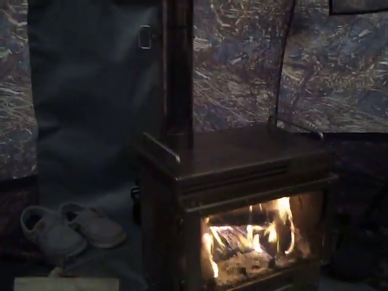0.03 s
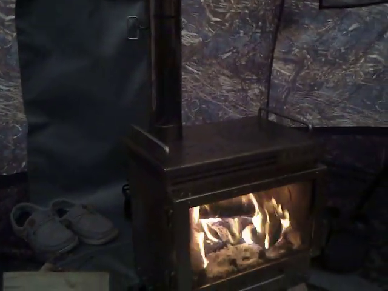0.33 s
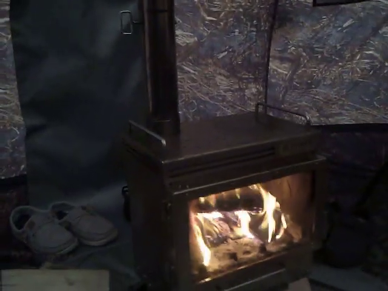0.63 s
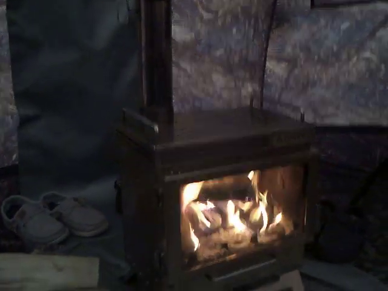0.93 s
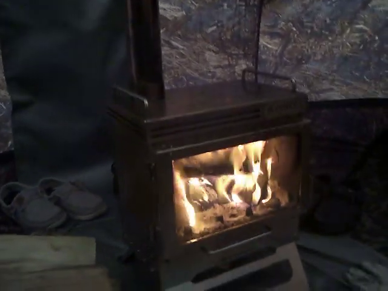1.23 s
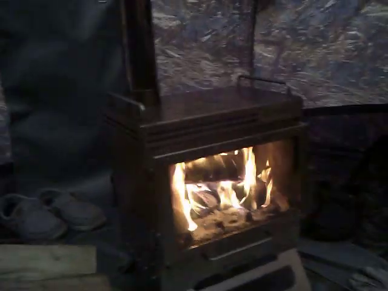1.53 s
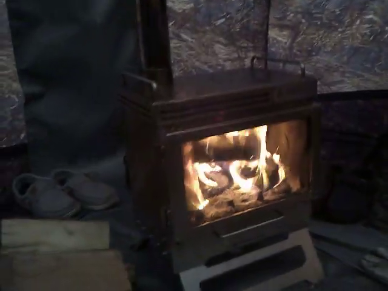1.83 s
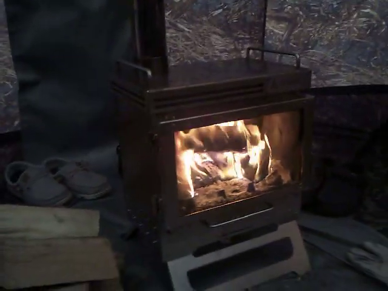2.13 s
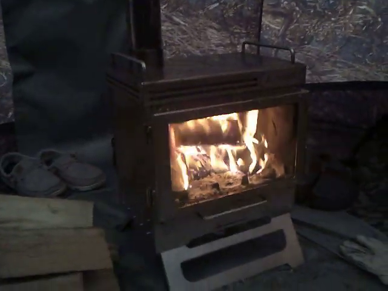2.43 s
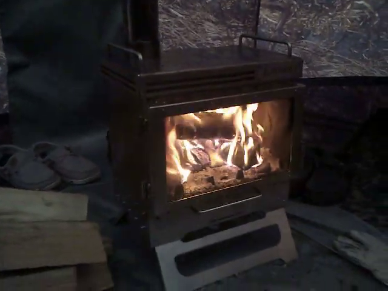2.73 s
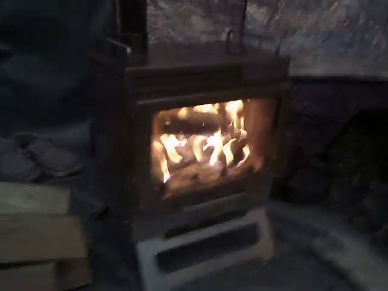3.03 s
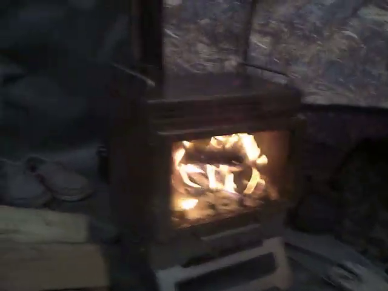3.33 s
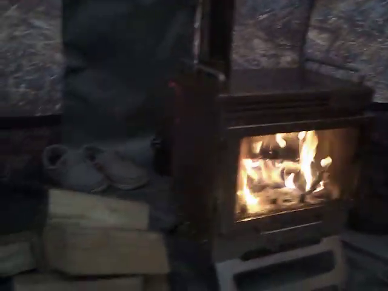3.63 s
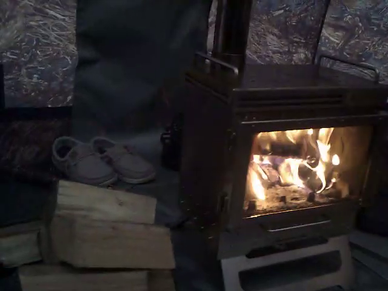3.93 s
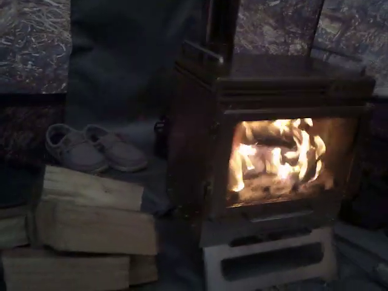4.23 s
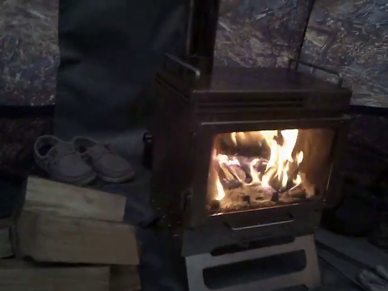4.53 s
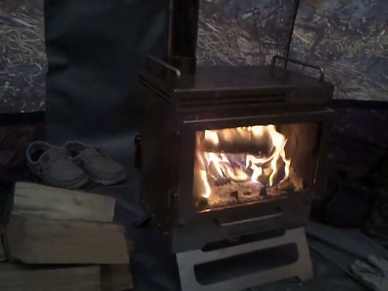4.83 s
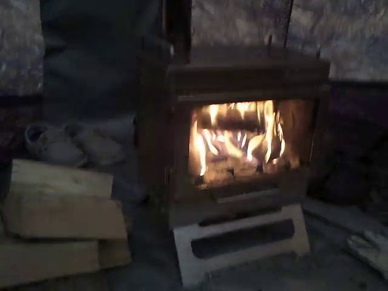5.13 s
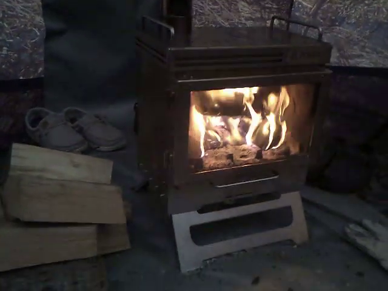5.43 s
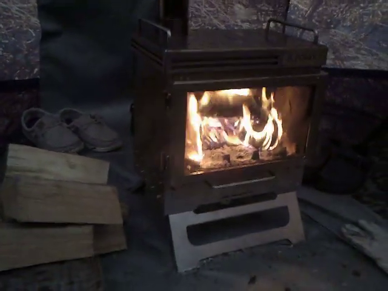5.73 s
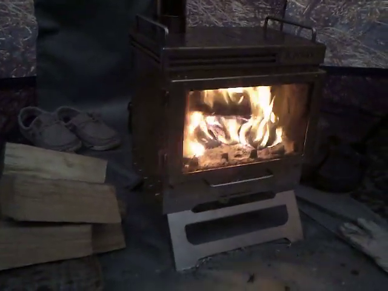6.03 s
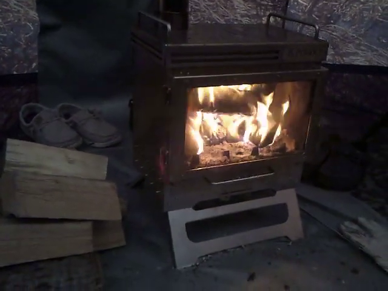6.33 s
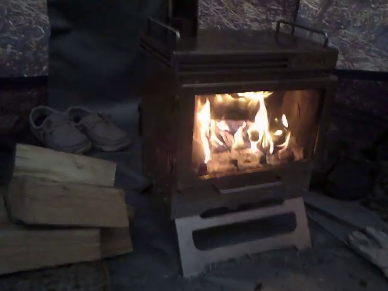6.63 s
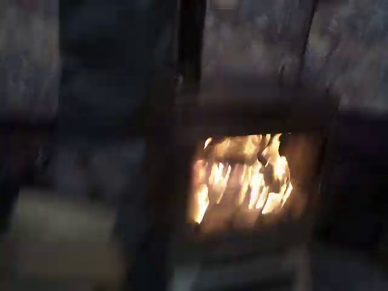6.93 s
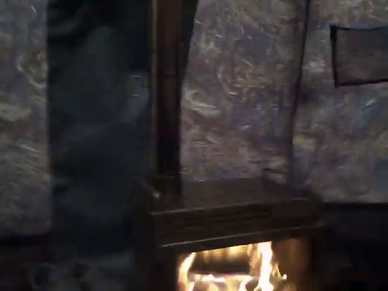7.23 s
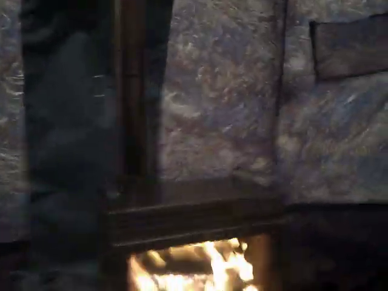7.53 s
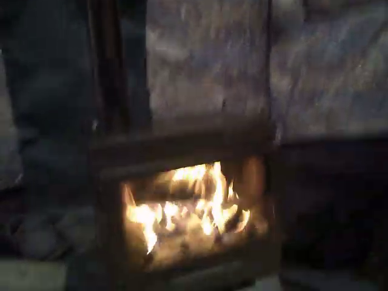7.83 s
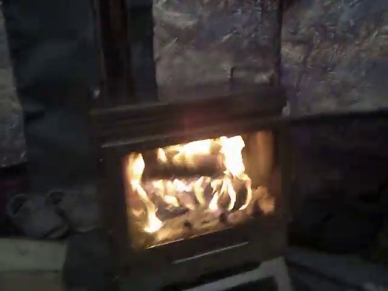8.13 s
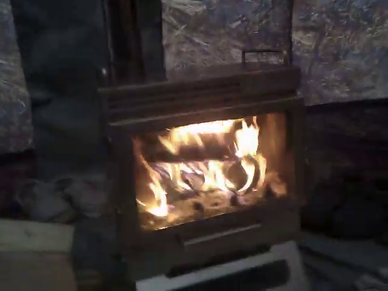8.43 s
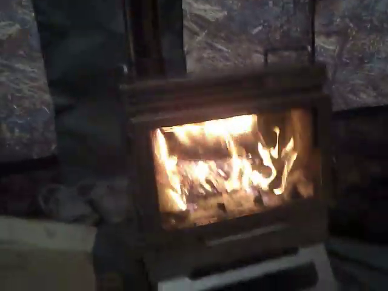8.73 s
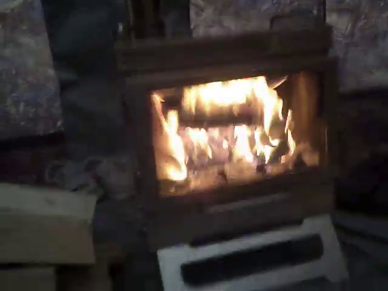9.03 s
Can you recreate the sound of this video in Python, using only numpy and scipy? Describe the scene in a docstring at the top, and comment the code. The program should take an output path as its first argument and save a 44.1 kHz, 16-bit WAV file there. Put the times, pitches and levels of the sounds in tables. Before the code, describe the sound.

Wood fire clicks and snaps in a stove over a low rumble and faint motor hum, with microphone handling near the end.

```python
"""Wood stove in a tent

Near the microphone, burning wood breaks in sharp clicks, snaps ring briefly in the steel firebox and
embers flare now and then. The draught rumbles; far off a motor, perhaps a generator, hums under it.
The hand-held camera moves, mostly near the end: clicks, sleeve strokes, scrapes and soft bumps."""
import sys
import numpy as np
from scipy import signal
from scipy.fft import rfft, irfft, next_fast_len
from scipy.io import wavfile
from scipy.ndimage import map_coordinates

SR = 44100
rng = np.random.default_rng(int(sys.argv[2]) if len(sys.argv) > 2 else 0)


def unload_wav(signal):
    """Save mono or channel-first audio to the path in sys.argv[1] as 16-bit WAV at rate SR, clipped to [-1, 1]."""
    wavfile.write(
        sys.argv[1],
        SR,
        np.round(np.clip(np.atleast_2d(signal).T, -1, 1) * 32767).astype(np.int16),
    )


N = 409688

# the microphone's own hiss (frequency [Hz], gain [dB])
HISS_SPECTRUM = [(3500, -20), (4500, -7), (5400, -8), (6100, -1), (7400, 0), (8200, -5), (9000, -12)]
# harmonics of the far motor (shaft order [multiple], base level [dB])
MOTOR_ORDERS = [(1, -52.5), (2, -46), (3, -59), (4, -69.5), (20, -64.5), (27, -73.5), (40, -86.5),
                (48, -87.5), (64, -87), (65, -89), (88, -92), (128, -101), (147, -104)]
# the whine fades and returns as the microphone moves through its reflections (time [s], gain [dB])
WHINE_GAIN = [(0, -3.5), (1.7, 4), (2.3, -2.5), (3.9, -4), (5.1, 3), (6.7, 1), (9.29, -4.5)]
# deep rumble of the draught (frequency [Hz], gain [dB])
RUMBLE_SPECTRUM = [(8, 7), (18, 2), (28, 7), (42, -2), (60, -4), (80, -12), (120, -35), (250, -83)]
# its slow rise and fall (time [s], level [dB])
RUMBLE_LEVELS = [(0, -41), (1.4, -44), (2, -47), (4.2, -45), (5.4, -42.5), (6.1, -48), (7.3, -42),
                 (8.7, -41), (9.29, -43)]
# fluttering flames (frequency [Hz], gain [dB])
FLUTTER_SPECTRUM = [(50, -5.5), (85, 3.5), (120, -0.5), (150, -2.5), (230, -7.5), (330, -12), (450, -22.5),
                    (800, -75)]
# air roaring through the stove (frequency [Hz], gain [dB])
ROAR_SPECTRUM = [(200, -15), (450, -1.5), (600, 3.5), (850, 3.5), (1020, -1), (1330, -18), (1500, -17),
                 (1850, -19), (2200, -22.5), (3100, -25), (3800, -33), (5200, -48), (8000, -72.5)]
# sleeve strokes right at the microphone (start [s], length [s], rub level [dB], hiss level [dB])
SLEEVE_STROKES = [(8.058, 0.086, -59.5, -81), (8.228, 0.18, -52.5, -70.5), (8.476, 0.021, -52.5, -67.5),
                  (8.781, 0.06, -54.5, -66.5), (8.897, .1, -55.5, -73.5), (9.071, 0.032, -54, -70.5)]
# rubbing cloth (frequency [Hz], gain [dB])
RUB_SPECTRUM = [(240, -15.5), (500, -6), (1000, 5), (1400, -5), (1900, -2), (2500, -9.5), (3200, -6),
                (3900, -23.5), (5000, -30), (6500, -53)]
# fingers on the camera's case (middle [s], level [dB], length [s], resonance [Hz])
FINGER_SCRAPES = [(0.231, -62, .09, 1600), (6.79, -64, 0.016, 1580), (8.342, -44, 0.041, 1450),
                  (8.422, -49, 0.012, 2780), (8.502, -43.5, 0.019, 1980), (8.802, -46, 0.018, 1570),
                  (8.929, -56.5, 0.079, 2590)]
# soft bumps on the camera (start [s], level [dB], pitch [Hz])
CAMERA_BUMPS = [(1.616, -22.5, 243), (3.001, -28.5, 18), (6.57, -40, 260), (6.84, -29.5, 14.4),
                (8.076, -28, 92), (8.361, -26.5, 91), (8.735, -29.5, 61), (8.7503, -28, 184)]
# the embers flare up (middle [s], half length [s], rise over the resting crackle [dB])
EMBER_FLARES = [(.6, 0.68, 13.5), (1.55, 0.31, 13), (4.7, 0.59, 10), (7.5, 0.45, 10.5), (8.7, 0.75, 12.5)]
# modes of the stove's steel plates (frequency [Hz], gain [dB], time to fall 60 dB [s])
PLATE_MODES = [(1518, -8, .3), (1570, -3, 0.12), (1710, -19.5, 0.17), (1850, -16.5, 0.27), (2350, -17, .2),
               (3020, -16.5, 0.32), (3440, -15.5, .15)]
# snaps inside the firebox (time [s], level [dB])
FIREBOX_SNAPS = [(0.4838, -54.5), (0.572, -59.5), (0.7386, -53.5), (0.8624, -64), (1.415, -52.5),
                 (1.6423, -59), (1.6934, -63), (1.821, -55.5), (1.91, -60), (2.339, -54.5), (3.136, -49),
                 (3.261, -50.5), (3.451, -56.5), (4.3156, -67), (4.423, -58), (4.7676, -54),
                 (6.1519, -64.5), (6.556, -55.5), (7.5333, -65), (7.589, -58), (7.6231, -62.5),
                 (7.8266, -67), (8.2354, -52), (8.798, -54)]
# body of a snap (frequency [Hz], gain [dB])
SNAP_SPECTRUM = [(150, -13), (290, -1), (420, -8), (800, -4.5), (1250, -5), (1700, 0), (2400, 0.5),
                 (3100, -2), (3900, -13), (5000, -17.5), (7000, -41.5)]
# sizzle of a snap, also the hiss of the sleeve (frequency [Hz], gain [dB])
SIZZLE_SPECTRUM = [(2500, -28.5), (4200, -8.5), (5200, -10), (6200, 7), (7500, 3.5), (8400, -12),
                   (9000, -23)]
# dry clicks close to the microphone, from burning wood and, from 8.03 s on, probably camera handling
# (time [s], level [dB], hardness [dB/octave], ring gain [dB], ring pitch [Hz])
SHARP_CLICKS = [(0.1208, -38.5, -3.5, 3, 1300.0), (0.1832, -42.5, -4.5, -4, 1550),
                (0.3739, -40.5, -9.5, 16, 880), (0.5492, -44.5, 2.5, 10, 850.0),
                (0.7515, -42.5, -2.7, -10, 950.0), (0.793, -46.5, 0.5, 3, 1000.0),
                (0.8151, -47.5, -2.5, 1, 990), (0.9016, -45.5, -2.5, 0.0, 1050),
                (1.0746, -61, 5.5, -6, 2990), (1.1008, -40.5, -6, 1, 890.0),
                (1.1109, -47.5, -5.5, 9.5, 2210.0), (1.298, -59.5, 6.5, -3, 2500),
                (1.3094, -34.5, -8, 14, 670.0), (1.4856, -37.5, -2.5, 11.5, 1120),
                (1.551, -46.5, -1.5, 6, 596), (1.5606, -59.5, 6, -1, 3030),
                (1.6663, -42.5, 0.5, 11, 1490.0), (1.6869, -38, -1.3, 8, 630),
                (1.8461, -45.5, -4.5, -4, 910), (3.0, -48.5, 6, -5, 2200), (3.025, -57.5, 4, 6, 1700),
                (4.4283, -44, 1, 5, 1530), (5.2839, -51.5, -4.4, 19, 1480.0), (6.8188, -38.5, 0, 8, 1050),
                (6.8386, -43.5, -0.5, -5, 2320.0), (8.0332, -44.5, -5.5, 2, 3300.0),
                (8.0703, -47, 0, -8, 3300.0), (8.077, -43, -4.5, 1, 3300.0), (8.186, -32, 1.6, 5, 2120),
                (8.222, -43, -7.5, 9, 1290), (8.2469, -37.5, 3, 16, 990.0), (8.361, -30.0, -9, 17.5, 2380),
                (8.4302, -35, 3.5, -1, 2660), (8.7269, -25.5, -3.5, 2.5, 1010.0),
                (8.86, -30.5, -8.6, 4, 790), (8.9372, -37.0, -11.5, 6.0, 3300.0),
                (8.98, -43.5, 2.5, 3, 980.0), (9.0605, -50, 1, 7, 1840), (9.0696, -38.0, -2.5, 17, 1730),
                (9.1495, -39.0, -3.5, 13, 1800.0), (9.246, -30, -1.8, 6.5, 960)]
# colour common to all clicks (frequency [Hz], gain [dB])
CLICK_SPECTRUM = [(40, -9), (200, -4), (450, -2.5), (850, 0.5), (1150, -3.5), (1350, -9), (1800, -4.5),
                  (2400, -11.5), (3000, -9), (3900, -23.5), (5100, -31.5), (6200, -26), (7800, -27.5),
                  (9000, -54.5)]
# range over which hardness tilts that colour (low [Hz], pivot [Hz], high [Hz])
TILT_BAND = (260, 1000, 5800)


def amp(db):
    """Decibels to gain."""
    return 10 ** (np.asarray(db) / 20)


def unit(x):
    """Scale to rms 1."""
    return x / np.sqrt(np.mean(x ** 2) + 1e-20)


def along(spectrum, hz):
    """A spectrum's dB at hz, interpolated on a log axis."""
    knots_hz, db = np.transpose(spectrum)
    return np.interp(np.log(hz + 1), np.log(knots_hz + 1), db)


def curve(points):
    """Join (time, value) points into one value per sample."""
    return np.interp(np.arange(N) / SR, *np.transpose(points))


def wobble(rate):
    """A smooth random curve, rate knots a second."""
    return map_coordinates(rng.standard_normal(int(N * rate / SR) + 4), [np.arange(N) * rate / SR])


def coloured(x, spectrum):
    """x shaped by a spectrum, at rms 1."""
    size = next_fast_len(N + SR // 2)
    gain = amp(along(spectrum, np.fft.rfftfreq(size, 1 / SR)))
    return unit(irfft(rfft(x, size) * gain, size)[:N])


def noise(spectrum, grain_db=0):
    """Coloured noise; grain_db makes single grains stand out of it."""
    return coloured(rng.standard_normal(N) * amp(grain_db * rng.standard_normal(N)), spectrum)


def ticks(per_second, spread_db):
    """Impulses of uneven size at random times."""
    return (rng.random(N) < per_second / SR) * amp(spread_db * rng.standard_normal(N))


def causal(gain):
    """The tightest causal response that has this gain."""
    cepstrum = irfft(np.log(np.maximum(gain, 1e-9)))
    half = len(cepstrum) // 2
    cepstrum[1:half] *= 2
    cepstrum[half + 1:] = 0
    return np.exp(rfft(cepstrum))


def resonance(hz, centre_hz, q):
    """A causal band-pass with gain 1 at its centre."""
    width = 1j * hz * centre_hz / q
    return width / (centre_hz ** 2 - hz ** 2 + width)


def burst(t, db, t60, rise_s=.002):
    """Spectrum of a short dying burst of noise."""
    tail = rng.standard_normal(len(t)) * amp(-60 * t / t60) * (1 - np.exp(-t / rise_s))
    return amp(db) * rfft(tail / np.linalg.norm(tail))


def add(track, s, sound):
    """Mix a sound in at time s."""
    part = track[max(round(s * SR), 0):][:len(sound)]
    part += sound[:len(part)]


def motor(shaft_hz=30.39, drift=.0012, waver_db=1.3, whine_order=20):
    """Far off, a motor hums on the low orders of its nearly steady shaft and whines on the high ones."""
    turns = np.cumsum(shaft_hz * (1 + drift * wobble(3))) / SR
    whine_db, out = curve(WHINE_GAIN), np.zeros(N)
    for order, db in MOTOR_ORDERS:
        level_db = db - waver_db * wobble(4) + whine_db * (order >= whine_order)
        out += np.sqrt(2) * amp(level_db) * np.sin(2 * np.pi * (order * turns + rng.random()))
    return out


def draught(flutter_db=-53.5, roar_db=-54.5, sink_db_per_s=.42):
    """Air drawn through the stove: deep rumble, fluttering flames and a slowly sinking roar."""
    rumble = amp(curve(RUMBLE_LEVELS) + .8 * wobble(1.9)) * noise(RUMBLE_SPECTRUM)
    flutter = amp(flutter_db + wobble(9.7)) * noise(FLUTTER_SPECTRUM)
    sunk_db = sink_db_per_s * np.arange(N) / SR
    roar = amp(roar_db - sunk_db + .51 * wobble(9.9)) * noise(ROAR_SPECTRUM)
    return rumble + flutter + roar


def sleeve(attack_s=.0068, swell_db=1.5, release_t60=.13, flicker_db=1.5, catch_db=-2):
    """A sleeve at the microphone grips, presses harder and lets go, catching in tiny ticks."""
    rub, hiss, t = np.zeros(N), np.zeros(N), np.arange(SR // 2) / SR
    for s, length, rub_db, hiss_db in SLEEVE_STROKES:
        pressure_db = swell_db * (np.minimum(t / length, 1) - .5)
        release_db = 60 * np.maximum(t - length, 0) / release_t60
        stroke = (1 - np.exp(-t / attack_s)) * amp(pressure_db - release_db)
        add(rub, s, amp(rub_db) * stroke)
        add(hiss, s, amp(hiss_db) * stroke)
    grip = amp(flicker_db * wobble(70))
    catches = coloured(ticks(per_second=70, spread_db=4), RUB_SPECTRUM)
    friction = rub * noise(RUB_SPECTRUM, grain_db=6) + hiss * noise(SIZZLE_SPECTRUM, grain_db=8.5)
    return grip * friction + amp(catch_db) * rub * catches


def scrapes(q=3.4, grain_db=5, size=16384):
    """A finger slides by the microphone: tiny slips swell and fade through one resonance of the case."""
    out, t, hz = np.zeros(N), (np.arange(size) - size / 2) / SR, np.fft.rfftfreq(size, 1 / SR)
    for s, db, length, centre_hz in FINGER_SCRAPES:
        slips = rng.standard_normal(size) * amp(grain_db * rng.standard_normal(size))
        rasp = unit(irfft(rfft(slips) * resonance(hz, centre_hz, q) ** 2))
        add(out, s + t[0], amp(db) * rasp * np.exp(-2 * (t / length) ** 2))
    return out


def bumps():
    """Each soft bump pushes the microphone to and fro once."""
    out, t = np.zeros(N), np.arange(SR // 2) / SR
    for s, db, pitch_hz in CAMERA_BUMPS:
        cycles = pitch_hz * t
        add(out, s, -amp(db) * np.sin(2 * np.pi * cycles) * np.exp(-(2 * cycles - 1) ** 2))
    return out


def embers(rest_db=-79.5, blur_t60=.037):
    """Tiny random ticks, blurred by the firebox; they swell with each flare."""
    t, now = np.arange(SR // 10) / SR, np.arange(N) / SR
    sparks = ticks(per_second=120, spread_db=1)
    blur = rng.standard_normal(len(t)) * amp(-60 * t / blur_t60)
    flare_db = sum(db * np.exp(-((now - s) / half) ** 2) for s, half, db in EMBER_FLARES)
    # (frequency [Hz], gain [dB])
    colour = [(200, -13.5), (800, 8.5), (1500, 2.0), (1900, 1.5), (3100, -2.0), (4000, -16),
              (5000, -30), (7000, -11.5), (9000, -46)]
    return amp(rest_db + flare_db) * coloured(signal.fftconvolve(sparks, blur)[:N], colour)


def steel(blows, coupling_db=-54):
    """The plates of the stove ring on faintly after each blow."""
    t = np.arange(SR // 2) / SR
    ring = sum(amp(db + coupling_db - 60 * t / t60) * np.sin(2 * np.pi * hz * t)
               for hz, db, t60 in PLATE_MODES)
    return signal.fftconvolve(blows, ring)[:N]


def snaps(body_t60=.16, sizzle_t60=.095, rise_s=.00072, grit_db=2):
    """Wood splits behind the stove's glass; the firebox smears each snap into a short gritty decay."""
    body, sizzle, t = np.zeros(N), np.zeros(N), np.arange(SR // 3) / SR
    onset = 1 - np.exp(-t / rise_s)
    for s, db in FIREBOX_SNAPS:
        sizzle_db = -65.5 + .62 * (db + 57.5)  # stronger snaps gain body faster than sizzle
        add(body, s - rise_s, onset * amp(db - 60 * t / body_t60))
        add(sizzle, s - rise_s, onset * amp(sizzle_db - 60 * t / sizzle_t60))
    grit = unit(amp(grit_db * wobble(900)))
    return grit * (body * noise(SNAP_SPECTRUM, grain_db=3.5) + sizzle * noise(SIZZLE_SPECTRUM))


def ragged_crack(hardness, ring_db, ring_hz, size=8192):
    """A short ragged impulse with its own damped ring, then scatter off near surfaces and the tent."""
    t, hz = np.arange(size) / SR, np.fft.rfftfreq(size, 1 / SR)
    ragged = burst(t, db=1 + hardness, t60=.0071)  # hard clicks are more ragged
    scatter = burst(t, db=-5, t60=.048)
    tent = burst(t, db=-14, t60=.16)
    # fabric lets the bass through and soaks up the treble, so mostly the middle lingers
    tail = (ragged + scatter + tent) * resonance(hz, centre_hz=2000, q=.22)
    # a hard click tilts the colour towards the treble, a soft one towards the bass
    low_hz, pivot_hz, high_hz = TILT_BAND
    octaves = np.log2(np.clip(hz, low_hz, high_hz) / pivot_hz)
    colour = causal(amp(along(CLICK_SPECTRUM, hz) + hardness * octaves))
    ring = amp(ring_db) * resonance(hz, ring_hz, q=1.8)
    return irfft((1 + tail) * colour * (1 + ring))


def clicks(faint_count=12, creak_db=-16, creak_t60=.021, span_s=.0116):
    """Close clicks of burning wood and, near the end, of handling: a brief creak, then a crack."""
    out, time_left = np.zeros(N), np.arange(SR // 50)[::-1] / SR
    # faint clicks fall at random, in the columns of SHARP_CLICKS
    faint = [((when + 1) / 2 * N / SR, -65 + 4 * loud, 2.5 * (1 + hard), 6, 2000 * 2 ** (pitch / 2))
             for when, loud, hard, pitch in rng.uniform(-1, 1, (faint_count, 4))]
    for s, db, hardness, ring_db, ring_hz in list(SHARP_CLICKS) + faint:
        crack = ragged_crack(hardness, ring_db, ring_hz)
        creak = rng.standard_normal(len(time_left)) * amp(-60 * time_left / creak_t60)
        creak *= amp(creak_db + hardness) / np.linalg.norm(creak)
        click = signal.fftconvolve(crack, np.r_[creak, 1])
        click *= np.sqrt(span_s * SR) / np.linalg.norm(click)  # the energy of span_s at rms 1
        add(out, s - len(creak) / SR, amp(db) * click)
    return out


def scene(hiss_db=-87):
    """One microphone in the tent, near the stove, over its own thin hiss."""
    crackle = clicks() + snaps() + embers()
    handling = sleeve() + bumps() + scrapes()
    background = draught() + motor() + amp(hiss_db) * noise(HISS_SPECTRUM)
    return (background + handling + crackle + steel(crackle))[None]


def record(dry, top_hz=8700):
    """The camera cuts off steeply above its band limit."""
    return signal.sosfilt(signal.ellip(10, .1, 90, top_hz, fs=SR, output="sos"), dry)


dry = scene()
out = record(dry)
unload_wav(out)
```